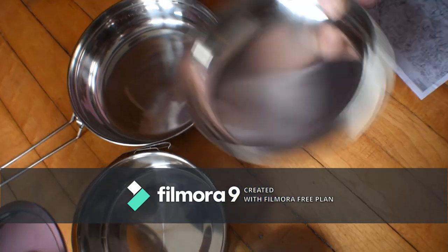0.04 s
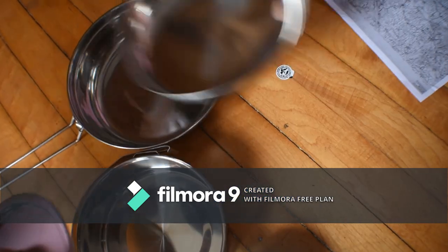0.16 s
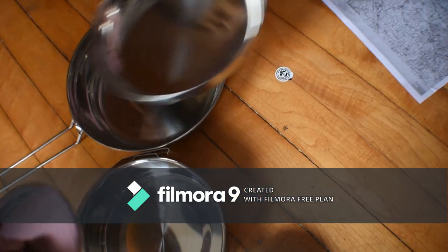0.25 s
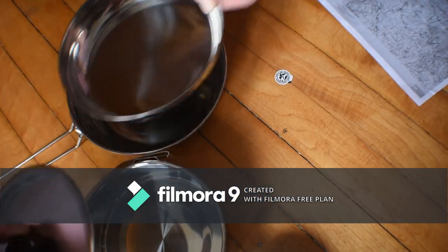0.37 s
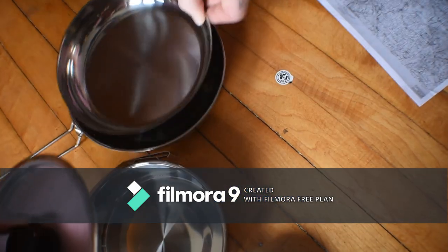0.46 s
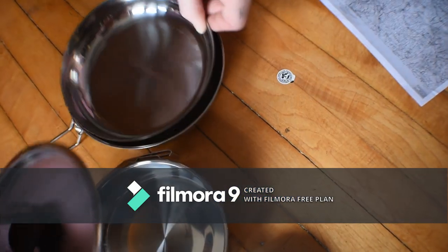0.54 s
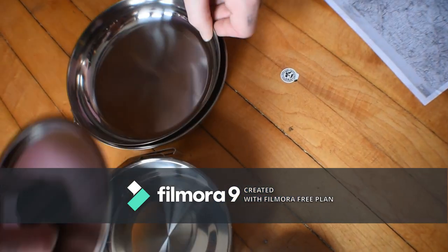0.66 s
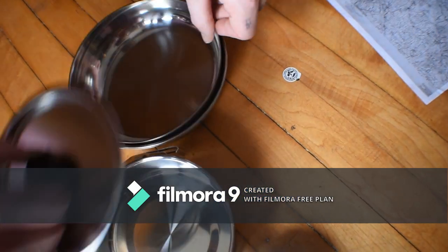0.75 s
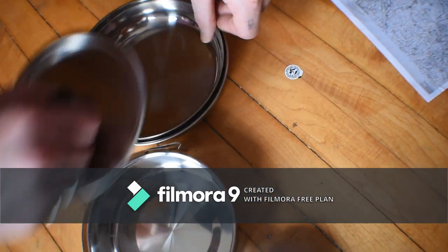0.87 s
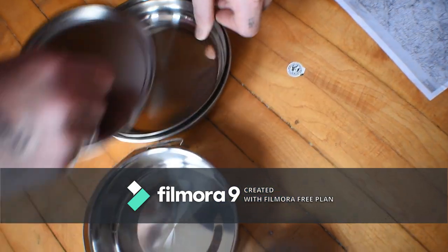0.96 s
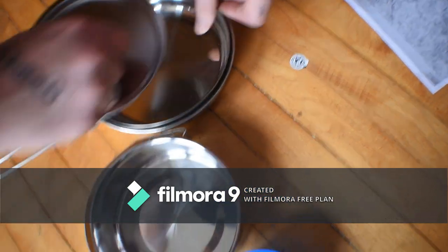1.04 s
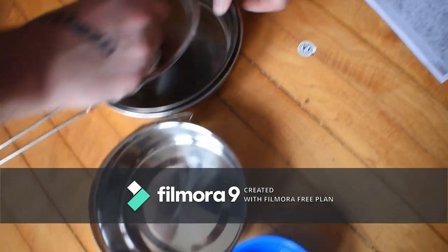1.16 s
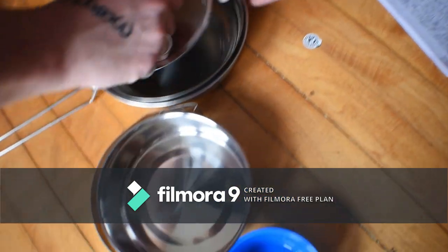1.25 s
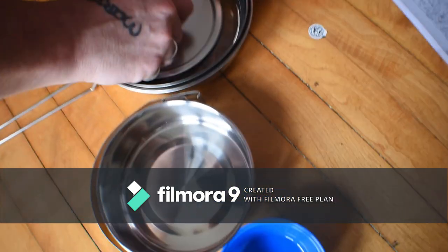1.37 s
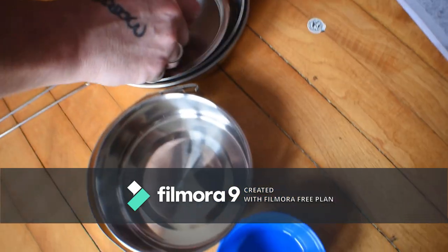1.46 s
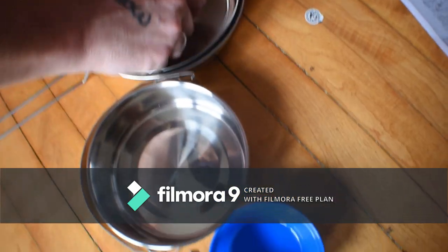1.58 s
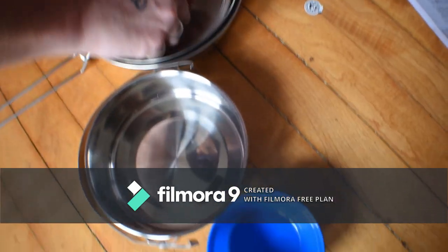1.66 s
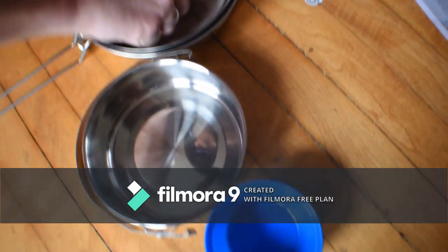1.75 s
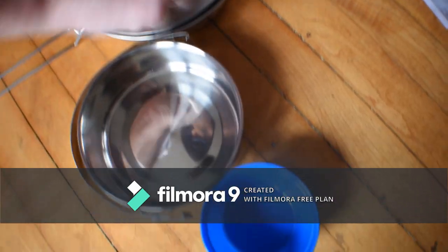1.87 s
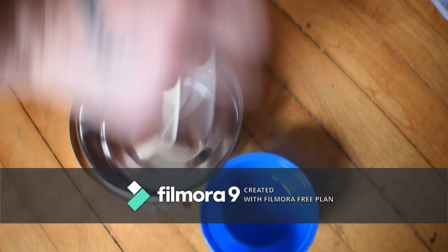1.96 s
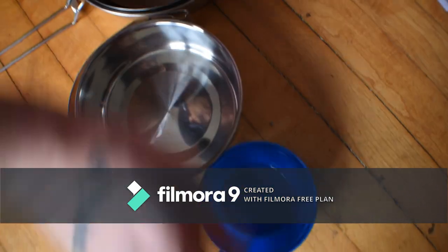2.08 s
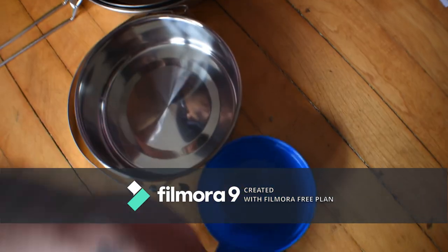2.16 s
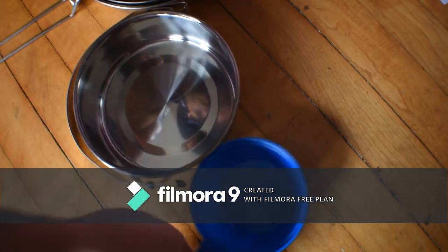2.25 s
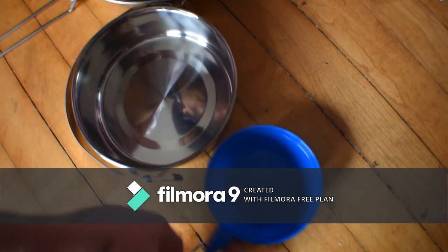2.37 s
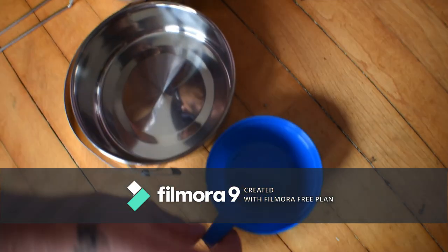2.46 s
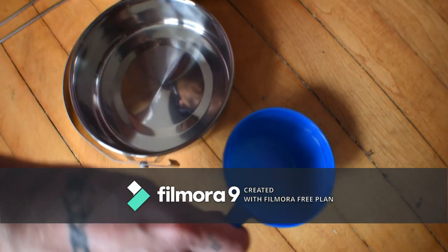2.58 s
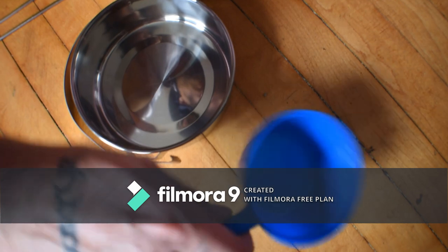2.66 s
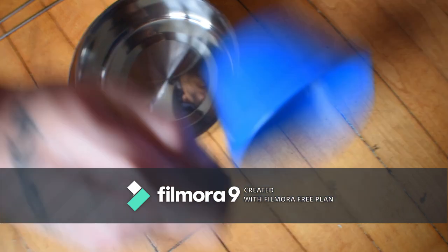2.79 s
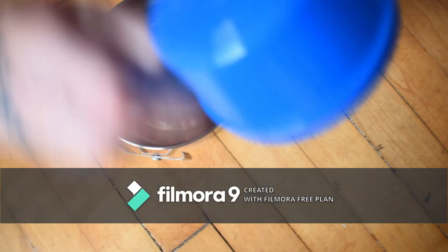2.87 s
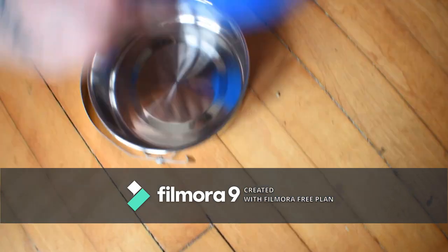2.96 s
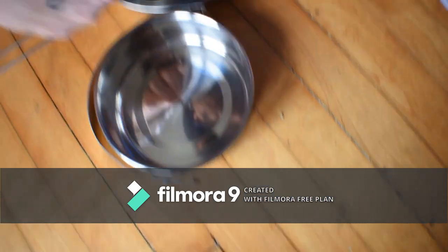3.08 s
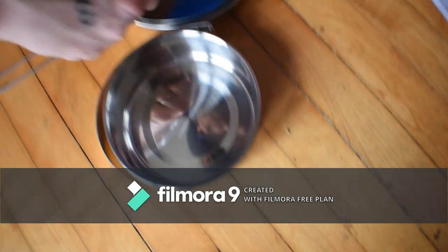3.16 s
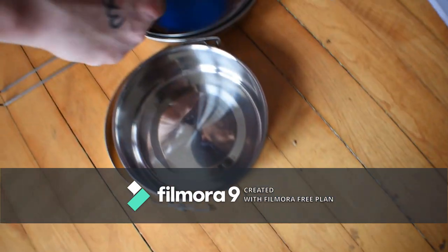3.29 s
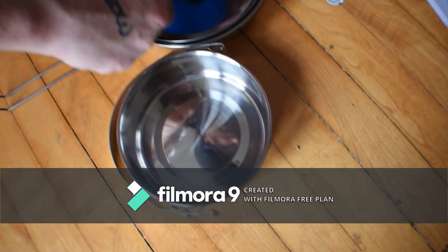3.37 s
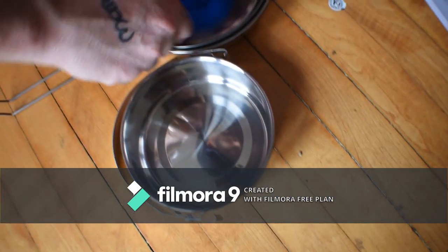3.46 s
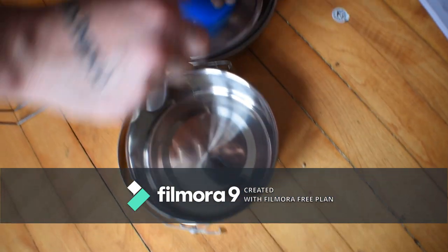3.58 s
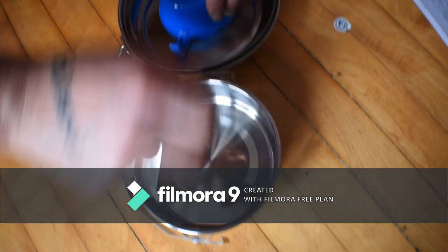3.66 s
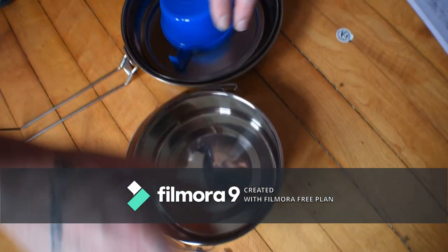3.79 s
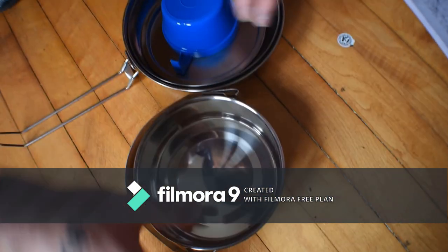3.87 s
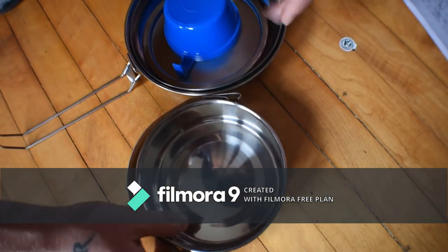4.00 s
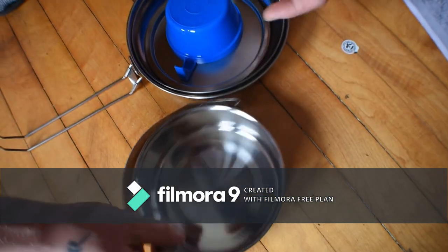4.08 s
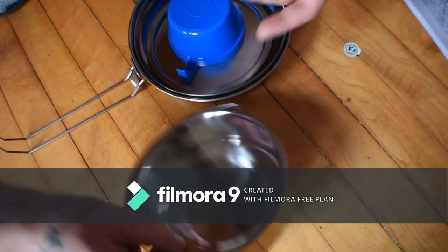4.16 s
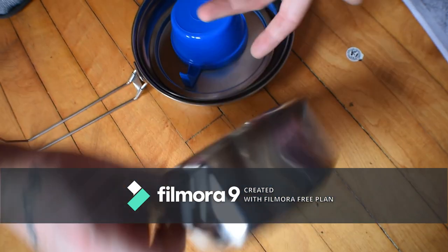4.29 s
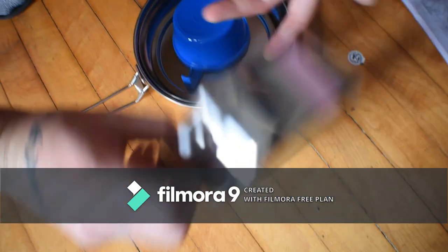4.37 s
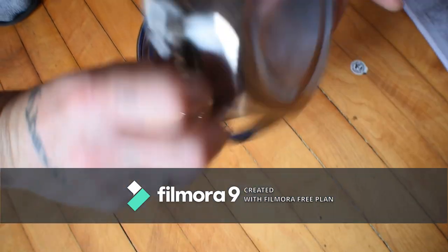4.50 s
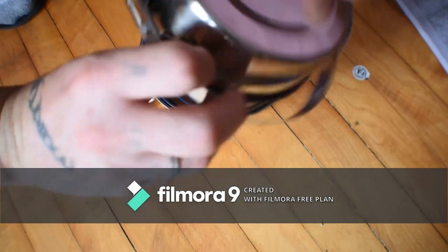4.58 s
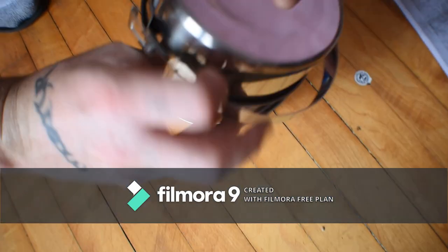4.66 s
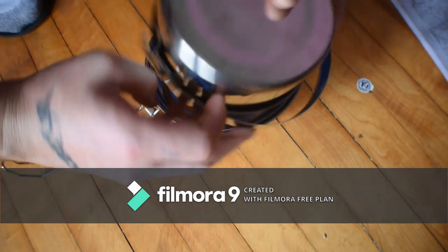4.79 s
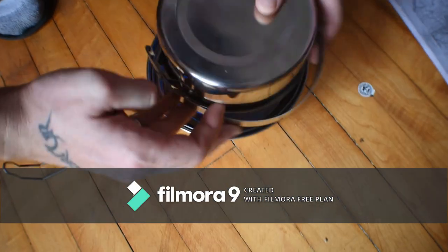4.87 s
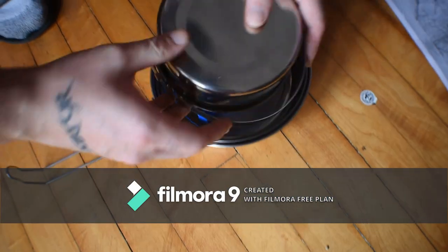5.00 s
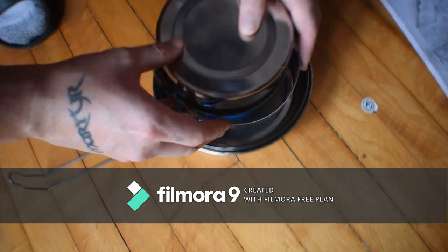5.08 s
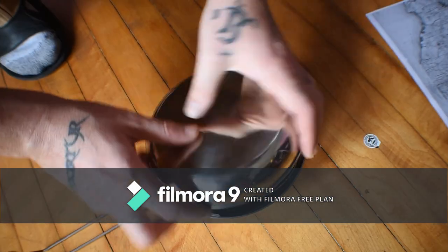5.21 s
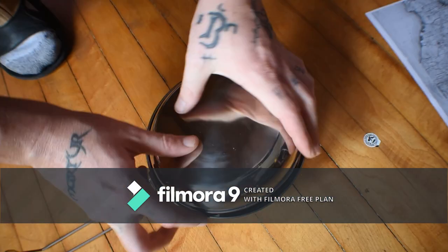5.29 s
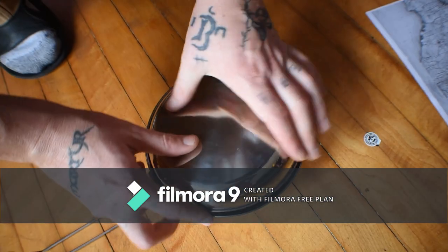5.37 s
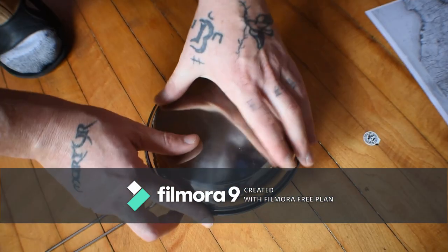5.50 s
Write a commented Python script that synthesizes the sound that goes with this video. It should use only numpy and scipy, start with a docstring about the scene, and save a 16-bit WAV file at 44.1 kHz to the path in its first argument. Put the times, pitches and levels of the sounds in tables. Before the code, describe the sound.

Thin steel cookware is packed by hand, heard close and fairly dry with short room reflections. First a bright plate clang rings on, then a dense bowl rattle, snappy plastic knocks, a quieter gap, another firm metal clank, a faint rub and pot ring, and finally a cluster of duller clanks. Soft sleeve rustle and faint room air lie underneath.

```python
"""Stainless steel mess kit packed on a wooden floor in a small room: clanks of clatter plus ringing modes.
A plate drops into the pan, a bowl rattles in, a plastic cup is knocked about and put on top,
and the pot is lifted, turned over and pressed onto the stack.
Cup: filtered noise bursts. Rubs: random slips through resonators. Floor, sleeves, air: shaped noise."""
import sys
import numpy as np
from scipy import signal
from scipy.fft import rfft, irfft
from scipy.io import wavfile

SR = 44100
rng = np.random.default_rng(int(sys.argv[2]) if len(sys.argv) > 2 else 0)


def inscribe(sig):
    """Save sig as 16-bit PCM at rate SR to the path in sys.argv[1].

    A 1-D sig is mono; a 2-D sig holds one channel per row.
    Samples are clipped to [-1, 1] before scaling.
    """
    pcm = np.round(np.clip(np.atleast_2d(sig).T, -1, 1) * 32767)
    wavfile.write(sys.argv[1], SR, pcm.astype(np.int16))


N = 244314
BURST_SAMPLES = 32768

# Steel contacts: (time [s], strength [dB], brightness [dB], free ring [dB])
# Plate drops into the pan and is pushed home
PLATE_HITS = [(0.453, -13, 2, 0), (0.468, -31, 12, -12), (0.606, -26, -10.5, -4), (0.709, -34, -15.5, -12),
              (0.772, -28.5, 0, 0), (0.7885, -20.5, 2, -28), (0.812, -28.5, 0.5, -3.5),
              (0.835, -27.5, 12, -38), (0.9, -27, -7.5, -7), (0.927, -27, 7, -24), (0.936, -28, -8, -8.5)]
# Bowl lands and rattles in
BOWL_HITS = [(1.291, -20.5, 13, -1), (1.3805, -24.5, 14, -6), (1.388, -21, 6.5, 2), (1.405, -24.5, -10, -6),
             (1.414, -23, 15, 1), (1.446, -20, 6.5, -0.5), (1.493, -23, 7, -12), (1.499, -20.5, 1, -1),
             (1.508, -25, 10.5, 0), (1.558, -23.5, -4, -6.5), (1.569, -25, 6, -8)]
# Pan is jostled, then takes the cup
PAN_HITS = [(1.143, -55, 32, -27), (1.654, -41, 2.5, -0.5), (1.675, -41, 21.5, -5),
            (1.695, -43.5, 12, -7.5), (1.749, -49.5, 15, -9), (1.799, -46, 19.5, -4.5),
            (1.829, -40.5, 12, -19), (1.868, -46, -2, -7), (3.441, -46, 3, 4.5), (3.484, -44.5, 4.5, 5),
            (3.547, -19.5, -3.5, -12.5), (3.594, -35.5, 4.5, 0), (3.683, -31, 0.5, -16.5),
            (3.705, -39, 3.5, -1), (3.783, -43, -1, -14), (3.807, -42, -5, -20.5), (3.899, -46.5, 3, -7.5)]
# Pot is touched, lifted and turned over
POT_HITS = [(2.315, -56.5, 31.5, 0), (4.127, -56.5, 21.5, -3.5), (4.1785, -39.5, -29, -32),
            (4.325, -52.5, -6.5, 6.5), (4.38, -53.5, -1, -20), (4.6205, -47.5, 1, -1), (4.676, -53, 3, 5.5),
            (4.719, -54, 9, 5.5), (4.759, -53, 15, 3), (4.815, -42.5, -1.5, -1.5), (4.965, -55, -21, 2),
            (5.128, -61, -19, 11.5)]
# Pot is pressed onto the stack
STACK_HITS = [(5.159, -32.5, -7, -14), (5.178, -39, 0, -1), (5.195, -25.5, -2.5, 7.5),
              (5.212, -36, 5, 16.5), (5.234, -38, -16, -11), (5.2556, -20, 6, -14.5),
              (5.354, -26, -3.5, -19), (5.384, -31, -3, -8), (5.445, -32.5, 10, -22),
              (5.531, -48.5, -16, -10)]

# Long-ringing modes of each piece: (frequency [Hz], relative level [dB], t60 before grip damping [s])
PLATE_MODES = [(571, -15, .6), (665, -9, .8), (795, -11, 1.2), (824, -17, .7), (1394, -15.5, 1.5),
               (1632, -16, 1.0), (1752, -10, .4), (2136, -23, .7), (2223, -10, .7), (2596, -21, 1.1),
               (2724, -5, 1.0), (3250, -13.5, .7), (3887, -19, .7), (3965, -16.5, 1.1), (5238, -15, .8),
               (5414, -20, .7), (5615, -17, .4), (6309, -20, .9), (6971, -15, .45), (7096, -15, .7),
               (7590, -14, .35)]
BOWL_MODES = [(560, -5.5, .5), (677, -10, .4), (810, -6, .7), (1007, -12, .6), (2653, -13, .3),
              (3102, -20, .4), (3187, -9.5, .55), (3385, -18, .5), (4219, -16, .22), (4490, -10, .4),
              (6140, -19, .4), (6421, -14, .15), (6750, -8, .11), (7000, -16, .22), (8649, -10, .12)]
PAN_MODES = [(630.4, 2.5, 0.24), (670, 1.5, 0.32), (857, -16.5, 0.084), (930, -17, 0.1),
             (1634, -18.5, 0.16), (1710, -10, 0.2), (1900, -31.5, 0.242), (2505, -17, 0.66),
             (3210, -14.5, 0.26), (3970, -8.5, 0.15), (4440, -9, 0.23), (6520, -12.5, 0.26)]
POT_MODES = [(907, 2.5, 0.26), (1322, -11.5, 0.94), (2130, -6, 0.06), (2320, -8, 0.13), (2530, -12, 0.059),
             (2868, 3.5, 0.066), (3320, -8, 0.041), (4730, -8.5, 1), (6000, -16, 0.82), (6900, -5, 0.24),
             (8370, -7.5, 0.34), (9040, -5.5, 0.17)]
STACK_MODES = [(427, -9, .3), (553, 9, .3), (828, -11, .3), (922, -7, .45), (1736, -5, .3), (2132, -8, .3),
               (2733, -6, .22), (3975, -7, .28), (4530, -10, .2), (4615, -9, .2), (6839, -11, .25)]
# Base of the pot rings as it is picked up: (frequency [Hz], level [dB], t60 [s])
BASE_MODES = [(539, -36.5, .95), (921, -42, .4)]

# Knocks of the plastic cup: (time [s], strength [dB], loudest frequency [Hz], fall away from it [dB/octave])
CUP_KNOCKS = [(2.2553, -15, 1460, 15.5), (2.315, -19, 1410, 5.5), (2.32, -24.5, 450, 6.5),
              (2.364, -23.5, 3540, 4), (2.4283, -29, 2760, 5.5), (2.4569, -26.5, 2840, 5.5),
              (2.4646, -29, 1110, 6.5), (2.554, -43, 4600, 6), (2.643, -47, 1260, 8),
              (3.062, -48, 3060, 1.5), (3.089, -47.5, 1890, 7), (3.595, -33, 330, 3),
              (3.967, -47, 594, 0.5), (4.045, -48, 7100, 13), (4.224, -41, 2800, 8),
              (4.262, -52, 2580, 2.5)]
# Thud, body, clang and sheen registers: (centre [Hz], width [Hz])
REGISTERS = [(220, 410), (750, 704), (2200, 5000), (6500, 10640)]
# Two faint dry ticks: (time [s], level [dB])
TICKS = [(1.968, -34), (1.989, -34)]
# Pieces of the kit bump dully on the floorboards: (time [s], level [dB])
FLOOR_BUMPS = [(0.553, -43), (0.794, -30.5), (0.927, -45), (1.32, -53), (1.499, -39), (3.43, -52),
               (3.6, -36), (3.753, -36.5), (3.965, -48), (5.129, -41.5), (5.376, -36), (5.444, -34.5),
               (5.49, -45)]

# Sleeve swishes: (middle [s], half length [s], level [dB])
SWISHES = [(.17, 0.052, -51.5), (1.08, 0.034, -44.5), (2.0, 0.068, -63), (2.42, 0.16, -55.5),
           (2.905, 0.05, -46), (3.14, 0.015, -46.5), (3.5, 0.31, -56), (5.3, 0.64, -58.5)]
# Pot rubs in the hand and along the pan: (middle [s], half length [s], level [dB])
RUBS = [(4.338, 0.039, -50), (4.55, .018, -51), (4.815, 0.02, -34.5), (4.96, 0.065, -45),
        (5.14, 0.031, -48.5)]
# Thin hiss of the pot shifted on the floor: (middle [s], half length [s], level [dB])
SHIFTS = [(2.15, 0.18, -61)]

# Spectra: (frequency [Hz], relative density [dB per Hz])
STEEL_COLOUR = [(30, -30), (100, -32), (160, 2.5), (310, 1), (460, -6.5), (570, 1.5), (950, -2),
                (1150, -4.5), (1700, 2.5), (3800, -3), (7200, 5.5), (8800, -2.5), (10800, -14),
                (15500, -35)]
CUP_COLOUR = [(30, -48), (110, -13), (170, 3.5), (270, -4.5), (380, 7), (800, -0.5), (1400, 8),
              (2400, -0.5), (4000, 6.5), (7000, 6.5), (10000, -14.5), (15500, -25)]
SLEEVE_COLOUR = [(60, -21), (170, -6.5), (600, -3.5), (1100, -3), (2200, -1.5), (4000, -3.5), (6800, -2.5),
                 (9500, -11.5), (12000, -24), (15500, -35.5)]
SHIFT_COLOUR = [(3000, -33), (6800, 5), (8400, 7), (10500, -16)]
BUMP_COLOUR = [(50, -17), (110, -16.5), (170, -0.5), (330, 2), (450, 1.5), (800, -24), (2500, -46)]
AIR_COLOUR = [(25, -17.5), (90, -21), (160, -10), (350, -2), (650, -2), (1400, -2), (2800, -9), (7000, -23),
              (11000, -25), (15500, -31)]
WALL_COLOUR = [(60, -27.0), (170, 5.5), (500, 6.5), (6000, -2.0), (15000, -4.5)]

AIR_DB, RUSTLE_DB = -60, -65   # rustle: the sleeves between swishes
BUMP_RISE_S, BUMP_T60_S = 0.0017, 0.13
FIRM_BLOW_DB = -25
THUD_GROWTH_DB_PER_DB = 0.47   # thud per dB of blow
CRACK_GROWTH_DB_PER_DB = 0.42   # extra crack per dB of blow
SPREAD_T60_S, RING_RISE_T60_S = 0.0044, 0.0093   # build-up of clatter and long rings
CLATTER_DOUBLING_DB = 18.5   # free ring that doubles the clatter t60
CHATTER_DB = 2   # touching rims chatter, so the clatter dies unevenly
BEAT_MAX_HZ, BEAT_DEPTH = 22.8, 0.27   # pieces not quite round: each mode beats
CUTOFF_HZ = 15800


def from_db(db):
    """Decibels to gain."""
    return 10 ** (np.asarray(db) / 20)


def rms_one(x):
    """Scale to an rms of one."""
    return x / np.sqrt(np.mean(x ** 2) + 1e-20)


def gain_at(points, hz):
    """Read a (frequency [Hz], level [dB]) table on a log-frequency axis."""
    point_hz, point_db = np.transpose(points)
    log_hz = np.log(np.maximum(hz, 1))
    return from_db(np.interp(log_hz, np.log(point_hz), point_db))


def coloured(x, colour):
    """Give a signal a spectrum; rms one."""
    hz = np.fft.rfftfreq(len(x), 1 / SR)
    return rms_one(irfft(rfft(x) * gain_at(colour, hz), len(x)))


def coloured_noise(colour, samples=N):
    """Gaussian noise with a spectrum; rms one."""
    return coloured(rng.standard_normal(samples), colour)


def dying(t_s, t60_s):
    """Exponential decay of 60 dB in t60_s."""
    return np.exp(-np.log(1000) * t_s / max(t60_s, 1e-3))


def add(out, start_s, sound):
    """Mix a sound in at a time."""
    at = int(start_s * SR)
    out[at:at + len(sound)] += sound[:len(out) - at]


def wander(count, step, spread_db):
    """Random gain, its dB drawn every step points and interpolated between."""
    knots = np.arange(0, count + step, step)
    return from_db(spread_db * np.interp(np.arange(count), knots, rng.standard_normal(len(knots))))


def vibration(strengths=1):
    """Crowd of vibrations in random phase; rms one."""
    phases = 2 * np.pi * rng.random(BURST_SAMPLES // 2 + 1)
    return rms_one(irfft(strengths * np.exp(1j * phases)))


def causal(gain):
    """Minimum-phase filter with these gains: nothing sounds before the blow."""
    cepstrum = irfft(np.log(gain))
    half = len(cepstrum) // 2
    folded = np.concatenate([cepstrum[:1], 2 * cepstrum[1:half]])
    return np.exp(rfft(folded, len(cepstrum)))


def tinted(burst, levels_db, colour):
    """Give a white burst the colour of the material and a level in each register."""
    hz = np.fft.rfftfreq(BURST_SAMPLES, 1 / SR)
    centre_hz, width_hz = np.transpose(REGISTERS)
    density_db = levels_db - 10 * np.log10(width_hz)
    gain = gain_at(np.column_stack([centre_hz, density_db]), hz) * gain_at(colour, hz)
    return irfft(rfft(burst) * causal(gain)) * np.sqrt(SR / 2)


def swells(rows):
    """Strokes of the hand: each rises and falls like a bell; their powers add."""
    t_s, power = np.arange(N) / SR, 0
    for middle_s, half_s, db in rows:
        bell = np.exp(-np.minimum(((t_s - middle_s) / half_s) ** 2, 60))
        power = power + from_db(db) ** 2 * bell
    return np.sqrt(power)


def struck_mode(start_s, hz, level_db, t60_s):
    """One mode struck once: a decaying sine."""
    t_s = np.maximum(np.arange(N) / SR - start_s, 0)
    fade = dying(np.minimum(t_s, 2 * t60_s), t60_s)
    return from_db(level_db) * np.sin(2 * np.pi * hz * t_s) * fade


def quiet_air():
    """Steady noise of the quiet room."""
    return from_db(AIR_DB) * coloured_noise(AIR_COLOUR)


def room(x, t60_s, wet_db, first_s):
    """Diffuse wall reflections as decaying noise, weak in the deep bass and duller than the direct sound."""
    t_s = np.arange(BURST_SAMPLES) / SR
    onset = np.clip(t_s / first_s - 1, 0, 1)
    echoes = coloured_noise(WALL_COLOUR, BURST_SAMPLES) * dying(t_s, t60_s) * onset
    return from_db(wet_db) * signal.fftconvolve(x, echoes / np.linalg.norm(echoes))[:N]


def sleeves():
    """Cloth friction: noise that swells with each swish over a steady rustle."""
    return np.hypot(swells(SWISHES), from_db(RUSTLE_DB)) * coloured_noise(SLEEVE_COLOUR)


def floor_shift():
    """Pot shifted on the floor: a swell of thin hiss."""
    return swells(SHIFTS) * coloured_noise(SHIFT_COLOUR)


def floor_bumps():
    """The wooden floor answers with a soft, short thud without pitch."""
    t_s, force = np.arange(N) / SR, 0
    for start_s, db in FLOOR_BUMPS:
        age_s = np.clip(t_s - start_s, 0, 1)
        rise = 1 - np.exp(-age_s / BUMP_RISE_S)
        force = force + from_db(db) * rise * dying(age_s, BUMP_T60_S)
    return force * coloured_noise(BUMP_COLOUR)


def dry_ticks():
    """Faint ticks: very short decaying sines."""
    return sum(struck_mode(start_s, hz=2040, level_db=db, t60_s=0.0059) for start_s, db in TICKS)


def rubs(slips_per_s, width_hz, hiss_db, uneven_db, squeak_hz, squeak_db):
    """Clumped tiny slips excite the pot and its squeaking rim, modes widened by the grip of the hand."""
    clump = SR // 50   # samples
    slips = (rng.random(N) < slips_per_s / SR) * rng.standard_normal(N) * wander(N, clump, uneven_db)
    radius, body = np.exp(-np.pi * width_hz / SR), 0
    for hz, db, *_ in POT_MODES + [(squeak_hz, squeak_db)]:
        poles = [1, -2 * radius * np.cos(2 * np.pi * hz / SR), radius ** 2]
        drive = slips * wander(N, clump, uneven_db) + 1e-18
        body = body + from_db(db) * signal.lfilter([1, 0, -1], poles, drive)
    rubbing = rms_one(body) + from_db(hiss_db) * rms_one(slips)
    return swells(RUBS) * coloured(rubbing, SLEEVE_COLOUR)


def cup(snap_db, snap_t60_s, hollow_db, hollow_t60_s, cavity_db, cavity_q):
    """Plastic: a hard snap and brief hollow after-sound, resonant at a pitch set by where it is struck."""
    out, t_s = np.zeros(N), np.arange(BURST_SAMPLES) / SR
    fade = from_db(snap_db) * dying(t_s, snap_t60_s) + from_db(hollow_db) * dying(t_s, hollow_t60_s)
    for start_s, db, hz, fall_db in CUP_KNOCKS:
        octaves = np.abs(np.log2(np.array(REGISTERS)[:, 0] / hz))
        burst = vibration() * fade
        cavity = signal.lfilter(*signal.iirpeak(hz, cavity_q, fs=SR), burst)
        burst = burst + from_db(cavity_db) * cavity
        add(out, start_s, tinted(burst, db - fall_db * octaves, CUP_COLOUR))
    return out


def blow_levels(db, bright_db, thud_db, clang_db):
    """Register levels of a blow: a hard edge tilts it to the treble, the thud grows slowly with force."""
    thud = thud_db + THUD_GROWTH_DB_PER_DB * (db - FIRM_BLOW_DB)
    return np.array([thud, db - bright_db / 2, db + clang_db, db + bright_db / 2])


def crack_and_clatter(levels_db, free_db, spacing_hz, clatter_db, clatter_t60_s, crack_db, crack_t60_s):
    """A short broadband crack, then many close sheet modes dying unevenly."""
    t_s, hz = np.arange(BURST_SAMPLES) / SR, np.fft.rfftfreq(BURST_SAMPLES, 1 / SR)
    # the floor thuds without pitch; higher up the sheet has separate modes
    share = np.where(hz < 600, 1, hz[1] / spacing_hz)
    # place of contact picks the sheet modes and favours some high groups
    sheet = (rng.random(len(hz)) < share) / np.sqrt(share)
    place = wander(len(hz), 130, 4) ** np.clip(hz / 3000, 0, 1)
    # a loose piece clatters longer than a held one
    t60_s = clatter_t60_s * 2 ** (free_db / CLATTER_DOUBLING_DB)
    clatter = vibration(sheet * place * rng.standard_normal(len(hz))) * dying(t_s, t60_s)
    clatter = from_db(clatter_db) * clatter * wander(BURST_SAMPLES, 150, CHATTER_DB)
    # the blow takes a moment to spread through the sheet
    clatter = clatter * (1 - dying(t_s, SPREAD_T60_S))
    # hard blows crack, light ones graze
    hardness_db = CRACK_GROWTH_DB_PER_DB * (max(levels_db) + 11.0)
    crack = from_db(crack_db + hardness_db) * vibration(place) * dying(t_s, crack_t60_s)
    return tinted(crack + clatter, levels_db, STEEL_COLOUR)


def long_rings(start_s, levels_db, level_db, modes, seated_s, seated_t60_s):
    """Beating pure modes; once seated or gripped, each touch detunes them and they die sooner."""
    t_s, count = np.arange(SR) / SR, len(modes)
    mode_hz, mode_db, mode_t60_s = np.transpose(modes)
    fades = np.array([np.sqrt(2) * dying(t_s, t60_s) for t60_s in mode_t60_s])
    pitch_hz = mode_hz * (1 + (start_s > seated_s) * .008 * rng.standard_normal(count))
    damping = dying(np.maximum(t_s - max(seated_s - start_s, 0), 0), seated_t60_s)
    centre_hz = np.array(REGISTERS)[:, 0]
    force = gain_at(np.column_stack([centre_hz, levels_db]), mode_hz) * rng.choice([-1, 1], count)
    beat_cycles = BEAT_MAX_HZ * rng.random((count, 1)) * t_s + rng.random((count, 1))
    beats = 1 + BEAT_DEPTH * np.sin(2 * np.pi * beat_cycles)
    tones = np.sin(2 * np.pi * np.outer(pitch_hz, t_s)) * (1 - dying(t_s, RING_RISE_T60_S))
    return (from_db(level_db + mode_db) * force) @ (fades * beats * tones) * damping


def steel(hits, modes, thud_db, clang_db, ring_db, seated_s, seated_t60_s, **sheet):
    """Each contact gives a crack, a clatter of close sheet modes and a few long pure rings."""
    out = np.zeros(N)
    for start_s, db, bright_db, free_db in hits:
        levels_db = blow_levels(db, bright_db, thud_db, clang_db)
        add(out, start_s, crack_and_clatter(levels_db, free_db, **sheet))
        add(out, start_s, long_rings(start_s, levels_db, ring_db + free_db, modes, seated_s, seated_t60_s))
    return out


def scene():
    """All the pieces of the kit, the sleeves and the quiet room."""
    plate = steel(PLATE_HITS, PLATE_MODES, thud_db=-50, clang_db=0.0, spacing_hz=28.04,
                  clatter_db=-3, clatter_t60_s=0.32, crack_db=13, crack_t60_s=.011,
                  ring_db=-4, seated_s=0.67, seated_t60_s=1.85)
    bowl = steel(BOWL_HITS, BOWL_MODES, thud_db=-48, clang_db=3, spacing_hz=34.7,
                 clatter_db=1.0, clatter_t60_s=.14, crack_db=8.0, crack_t60_s=0.02,
                 ring_db=-1.0, seated_s=1.37, seated_t60_s=0.55)
    pan = steel(PAN_HITS, PAN_MODES, thud_db=-47, clang_db=6.5, spacing_hz=22.3,
                clatter_db=-2.5, clatter_t60_s=0.28, crack_db=3.5, crack_t60_s=0.065,
                ring_db=2.5, seated_s=2.4, seated_t60_s=1.1)
    pot = steel(POT_HITS, POT_MODES, thud_db=-47.5, clang_db=4.5, spacing_hz=34.8,
                clatter_db=1.5, clatter_t60_s=0.12, crack_db=8.5, crack_t60_s=0.023,
                ring_db=-3, seated_s=4.3, seated_t60_s=1.0)
    stack = steel(STACK_HITS, STACK_MODES, thud_db=-41, clang_db=1.5, spacing_hz=23.06,
                  clatter_db=0.5, clatter_t60_s=0.24, crack_db=7.5, crack_t60_s=0.033,
                  ring_db=-4.0, seated_s=5.25, seated_t60_s=0.36)
    floor_thump = struck_mode(.453, hz=111, level_db=-17.5, t60_s=0.015)
    pot_base = sum(struck_mode(4.1785, *mode) for mode in BASE_MODES)
    kit = plate + bowl + pan + pot + stack + floor_thump + floor_bumps() + pot_base + dry_ticks()
    kit += rubs(slips_per_s=3100, width_hz=38, hiss_db=1, uneven_db=5, squeak_hz=2910, squeak_db=-1.5)
    kit += cup(snap_db=1.5, snap_t60_s=0.014, hollow_db=-14.0, hollow_t60_s=0.13, cavity_db=2, cavity_q=3.5)
    reflections = room(kit, t60_s=0.36, wet_db=-12.5, first_s=0.0042)
    return (kit + reflections + floor_shift() + sleeves() + quiet_air())[None]


def record(dry):
    """Round off the hardest peaks and cut the top."""
    rounded = 1.1 * np.tanh(dry / 1.1)
    low_pass = signal.ellip(10, .1, 80, CUTOFF_HZ, fs=SR, output="sos")
    return signal.sosfilt(low_pass, rounded)


dry = scene()
out = record(dry)
inscribe(out)
```